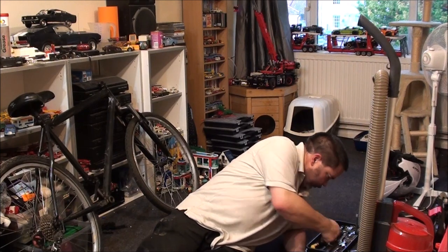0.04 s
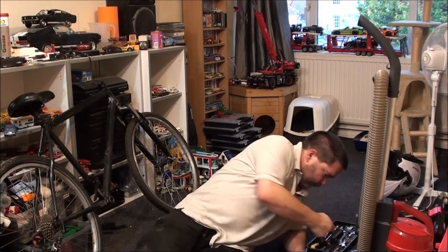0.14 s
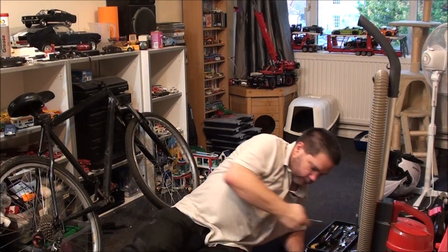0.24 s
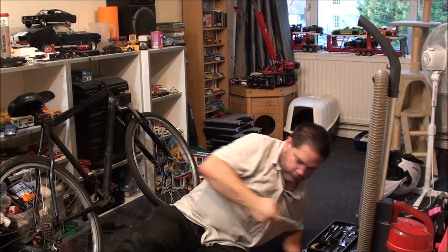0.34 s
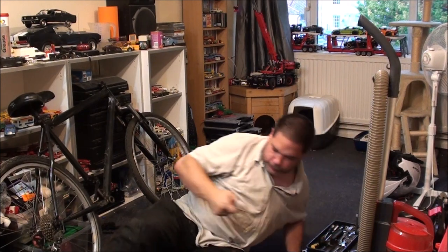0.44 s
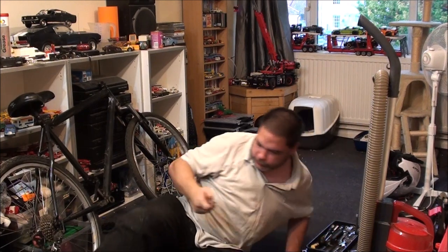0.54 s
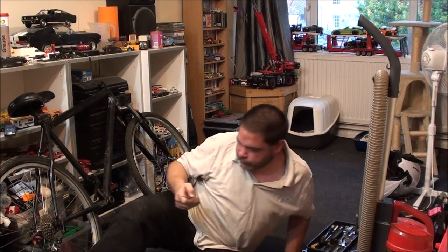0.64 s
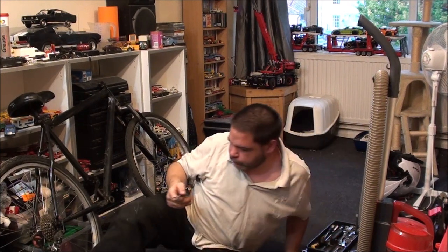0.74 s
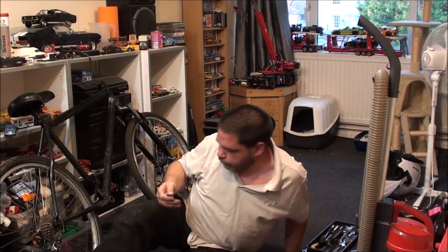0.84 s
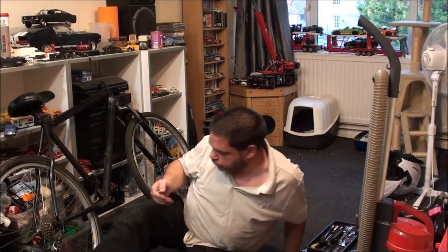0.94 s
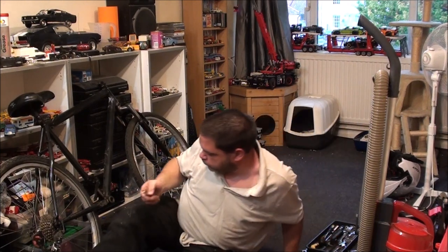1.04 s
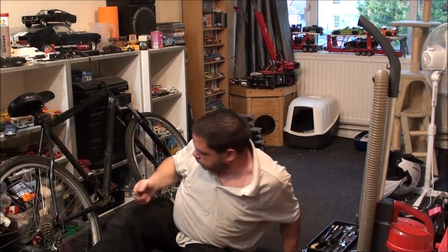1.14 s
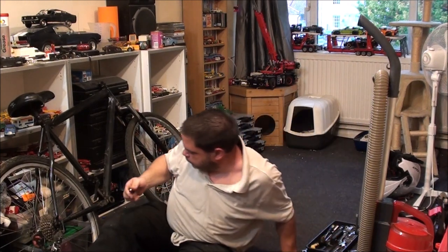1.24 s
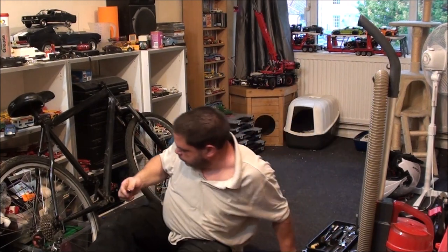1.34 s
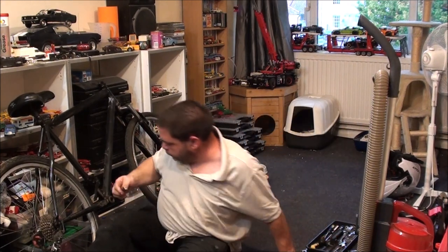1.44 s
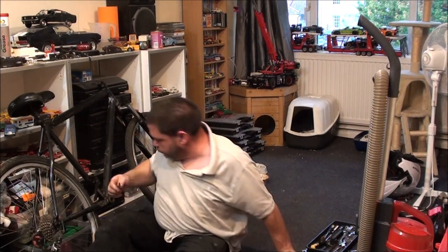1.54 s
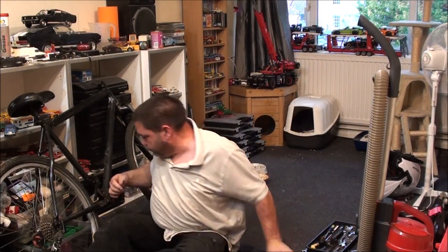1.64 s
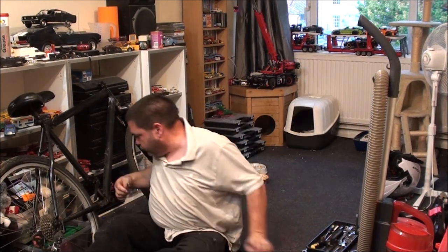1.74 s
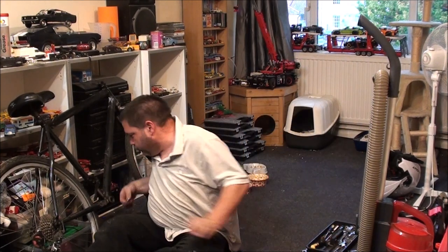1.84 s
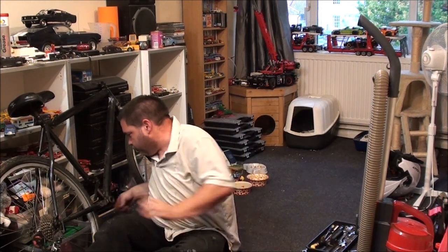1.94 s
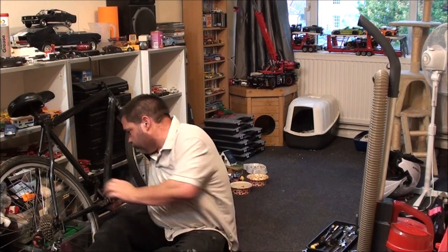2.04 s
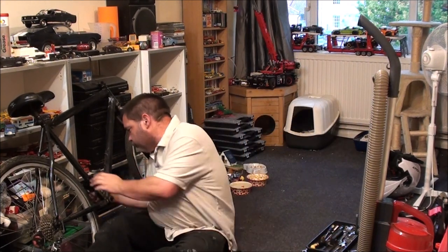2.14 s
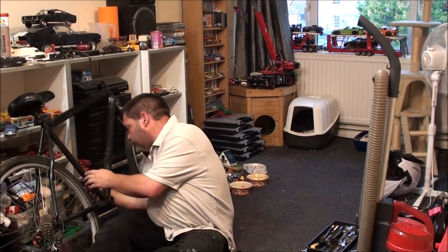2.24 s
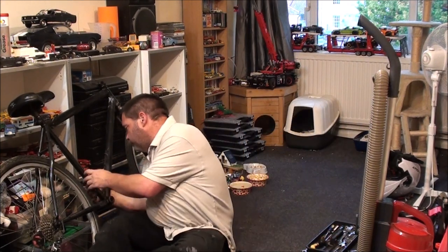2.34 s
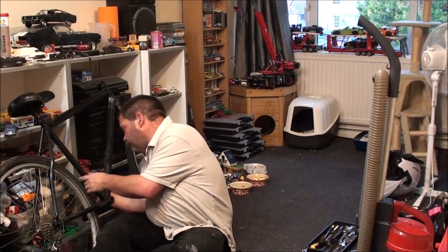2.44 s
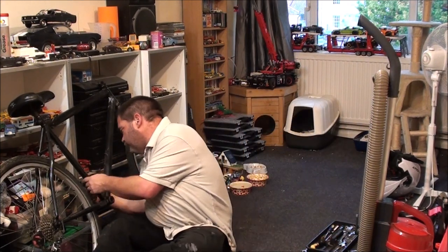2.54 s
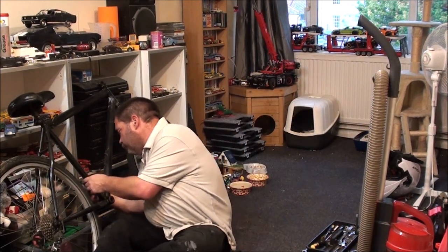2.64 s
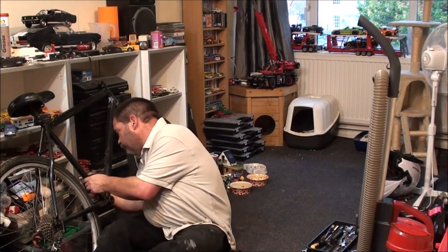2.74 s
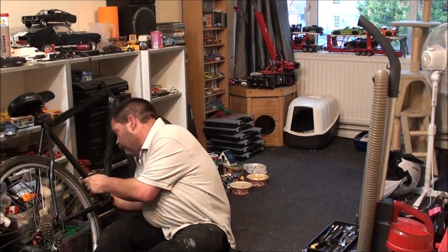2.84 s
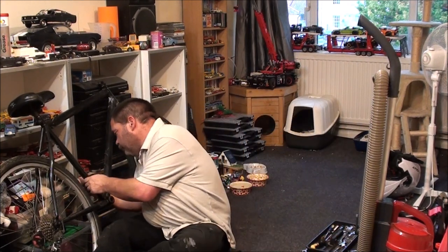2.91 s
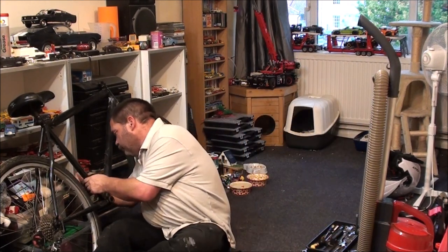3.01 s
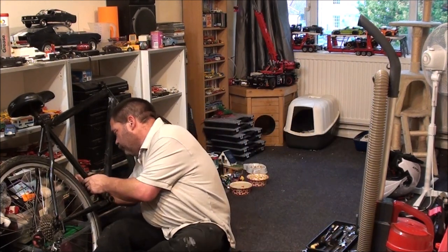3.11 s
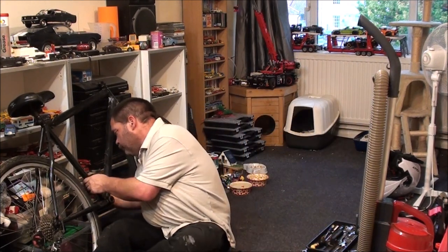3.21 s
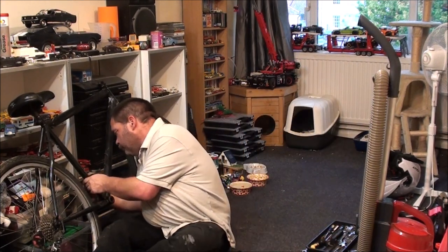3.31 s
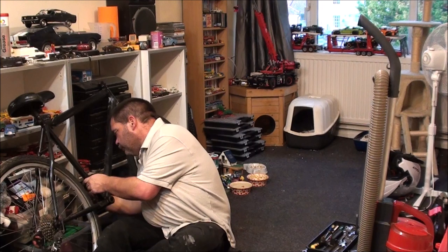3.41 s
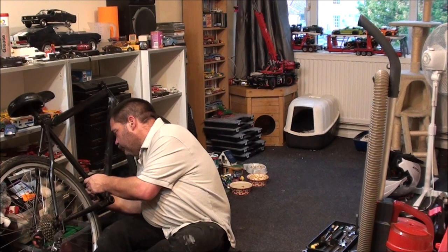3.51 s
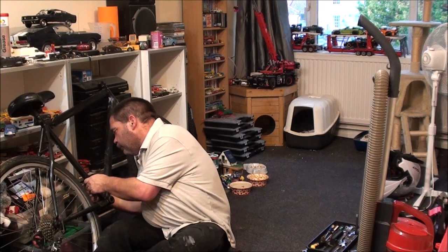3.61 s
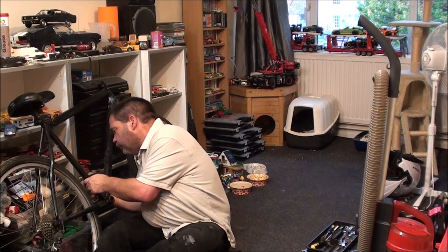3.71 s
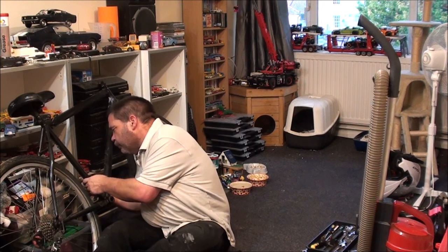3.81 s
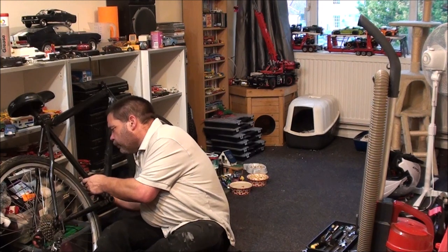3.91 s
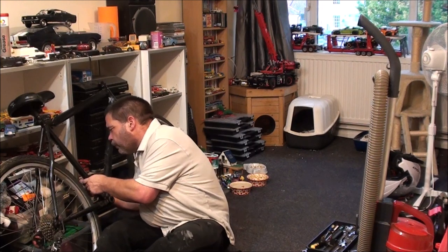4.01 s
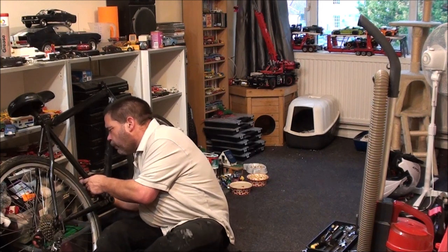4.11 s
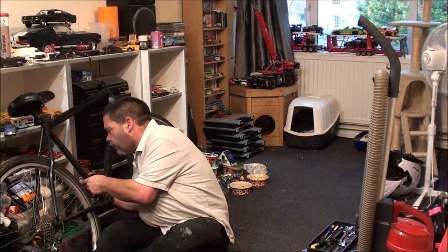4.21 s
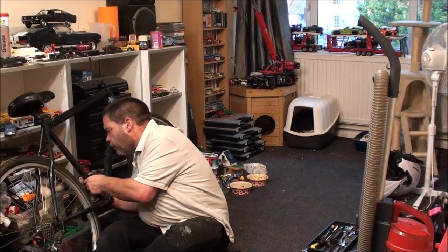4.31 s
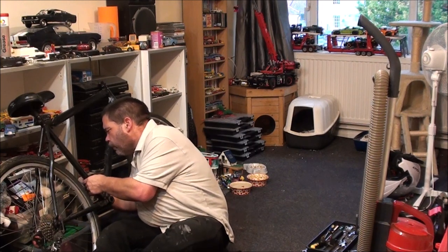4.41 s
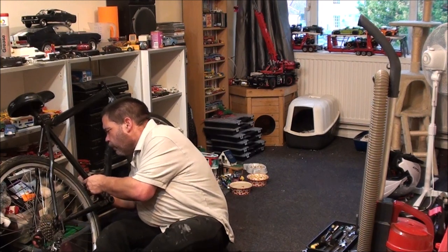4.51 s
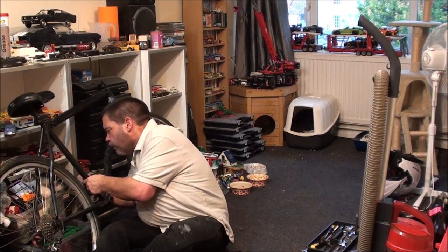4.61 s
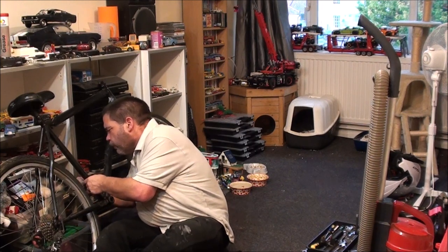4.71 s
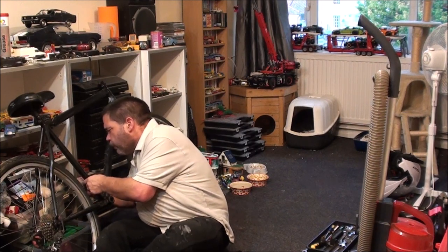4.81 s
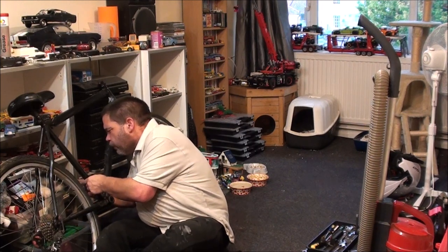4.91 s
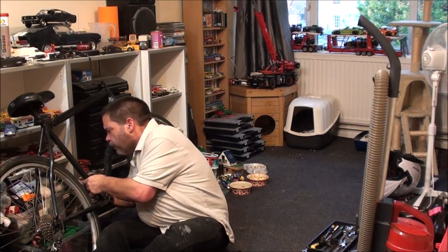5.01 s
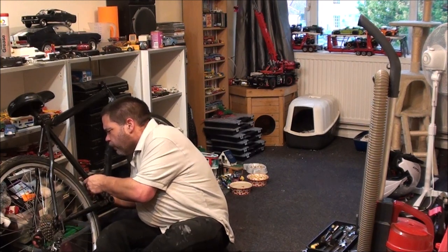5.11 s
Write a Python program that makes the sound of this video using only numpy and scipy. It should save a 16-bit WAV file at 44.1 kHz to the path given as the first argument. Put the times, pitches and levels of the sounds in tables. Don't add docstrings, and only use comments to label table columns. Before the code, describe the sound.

Close, bright tool clinks and a plastic clatter open the scene, then a tight group of three hollow knocks. Soft body movement drags over carpet and thuds lightly. Spaced metallic snaps follow on bike tubing, one very loud, one barely audible, one moderate. Short dry indoor reverberation, nearly centred stereo, with low hum, thin hiss and automatic gain that ducks and slowly recovers.

```python
import sys
import numpy as np
from scipy import signal
from scipy.fft import rfft, irfft
from scipy.io import wavfile
from scipy.ndimage import uniform_filter1d

SR = 44100
rng = np.random.default_rng(int(sys.argv[2]) if len(sys.argv) > 2 else 0)


def store_pcm(level_fs):
    pcm = np.round(np.clip(level_fs, -1, 1) * 32767).astype(np.int16)
    wavfile.write(sys.argv[1], SR, np.atleast_2d(pcm).T)


def convert_level_to_amplitude(level_db):
    exponent = np.asarray(level_db, float) / 20
    return 10 ** exponent


N = 227458


def tray():
    # start_s, peak_db
    first_clinks = [
        (0.0184, -19.5),
        (0.032, -20.5),
        (0.0385, -32),
    ]
    second_clinks = [
        (0.0725, -5.5),
        (0.0855, -16),
        (0.094, -35),
    ]
    tool_hz = [2050, 5110, 5426, 5870, 6425, 6977, 7155, 8543, 9410, 11340, 11395, 11610, 12330, 12910,
               14050, 14810]
    # first_clink_db, second_clink_db, t60_s
    tool_modes = [(-3, -12, 0.055), (-4, -15, 0.057), (-3, -20, 0.046), (-22, -24, .1), (6, 2.5, 0.077),
                  (-4, -16, 0.088), (-15, 0.5, 0.16), (-7, -5.5, 0.18), (-9, -27, 0.11), (-24, -8, 0.28),
                  (-3, 3.5, 0.22), (-22, -20, 0.082), (-26, -18, .14), (-10, -26, 0.1), (-28, -11, 0.15),
                  (-30, -7, .13)]
    # start_s, peak_db
    drops = [
        (0.0185, -20),
        (0.0725, -30),
        (0.0855, -2),
        (0.0995, -8),
        (0.112, -16),
    ]
    # start_s, peak_db
    knocks = [
        (0.4385, 0.87),
        (0.4605, 3.1),
        (0.4885, 3.1),
    ]
    # pitch_hz, level_db_per_hz
    drop_colour = [(120, -30), (200, -23.5), (1090, 3), (1540, -9), (2420, -13.5), (2950, -11),
                   (5550, -14.5), (7280, -14), (10800, -24), (11600, -17), (15000, -32)]
    knock_colour = [(120, -63), (200, -41), (427, -1.5), (503, -8.5), (636, 0.5), (896, -15.5),
                    (1090, -7.5), (1200, -15.5), (2020, -22), (2380, -37.5), (7280, -52), (15000, -77)]
    # pitch_hz, level_db, t60_s
    floor_modes = [(885, -2, 2.6), (1196, -8, 0.25), (1470, -10, 0.29), (1802, -8, 5.0), (1992, -14, 0.27),
                   (2200, 6, 0.24), (2337, -4, 0.23), (2410, 4.5, 0.037)]
    wall_modes = [(543, -18, 0.27), (610, -18, 0.42), (710, -3, 0.082), (740, 4.5, 0.19), (1100, -9, 0.23),
                  (1260, -15, 0.46), (1380, -18, 0.28), (1610, -24, 0.16), (1723, -23, 0.15),
                  (2030, -30, 0.48)]

    first_db, second_db, t60_s = np.transpose(tool_modes)
    first_modes = np.transpose([tool_hz, first_db, t60_s])
    second_modes = np.transpose([tool_hz, second_db, t60_s])
    steel = ring(first_clinks, first_modes, -7.0, 0.4, uneven_db=5.0)
    steel += ring(second_clinks, second_modes, -15.5, 0.93, uneven_db=2.5)
    drop = crack(drops, drop_colour, 5.5) + ring(drops, floor_modes, -32.5, 0.45)
    knock = crack(knocks, knock_colour, 4.6) + ring(knocks, wall_modes, -27.5, 0.12)
    out = room(steel, direct_db=-5.5, wet_db=-24.5, side_db=-13, pan_db=0.1)
    out += room(drop, direct_db=-1.5, wet_db=-16, side_db=-17.0, pan_db=0.1)
    out += room(knock, direct_db=8.9, wet_db=-19.5, side_db=-17.5, pan_db=0.1)
    return out


def snaps():
    # start_s, peak_db
    blows = [
        (2.3783, -9.5),
        (2.6485, -3),
        (3.3622, 10),
        (4.052, -31.5),
        (4.366, -11.5),
    ]
    # pitch_hz, level_db_per_hz
    first_colour = [(530, -17), (900, -11.5), (1180, -7), (1440, -8), (2100, -18), (2300, -8.5),
                    (2970, -15), (3640, -11.5), (5030, -9.5), (6720, -0.5), (7520, -8.5), (9940, -18),
                    (11600, -30), (13000, -37)]
    second_colour = [(530, -23), (900, -11.5), (1310, -17), (1660, -8.5), (2040, -15.5), (2450, -2.5),
                     (3110, -15), (3470, 0.5), (3860, -7.5), (4200, -0.5), (4700, -6), (6480, -10.5),
                     (6940, -3.5), (7350, -8.5), (8600, -4.5), (9500, -15), (12400, -18), (16000, -27)]
    loud_colour = [(190, -40), (320, -23.5), (409, -29.5), (737, -21), (787, -38), (1090, -11.5),
                   (1240, -23), (1490, -12.5), (1800, -26), (2300, -12), (2900, -18.5), (3220, -9.5),
                   (3800, -12), (4540, -24.5), (5750, -4), (6720, -1), (7400, -5), (10800, -9),
                   (16000, -24)]
    faint_colour = [(880, -50), (1500, -13), (2380, -5), (2600, -1), (3120, -5), (3840, -3), (4450, -13),
                    (5480, -7), (7400, -9), (8620, -0.5), (12000, -31), (15600, -56), (22000, -120)]
    last_colour = [(290, -29), (500, -15), (559, -2), (608, -17), (729, -10.5), (1140, -2), (1930, -9),
                   (2560, -0.5), (2940, -11), (3780, -1.5), (4280, -5.5), (6780, -6.5), (9740, -19),
                   (14000, -45)]
    frame_hz = [345, 1093, 2230, 2466, 2622, 2832, 3138, 3365, 3500, 4075, 5340, 5685, 5798, 6352, 6508,
                6632, 6940, 8016, 9265, 9620, 10490]
    # level_over_colour_db, t60_s
    frame_modes = [(2.5, 0.34), (-6, 0.15), (-1, 0.41), (-10, 0.42), (-13, 0.3), (-1, 0.47), (-1, .22),
                   (-1, 0.27), (-2, .24), (-4, 0.22), (-11, .2), (-9, 0.16), (3, 0.16), (-4, 0.32),
                   (0, 0.23), (-1, 0.29), (-10, 0.48), (-9, 0.14), (-11, 0.13), (-15, .14), (14, 0.18)]

    colours = [first_colour, second_colour, loud_colour, faint_colour, last_colour]
    modes = np.column_stack([frame_hz, frame_modes])
    cracks, tubes = np.zeros(N), np.zeros(N)
    for blow, colour in zip(blows, colours):
        cracks += crack([blow], colour, 2.95)
        tubes += ring([blow], modes, -23.5, 0.9, colour=colour, uneven_db=2.5)
    out = room(cracks, direct_db=-36, wet_db=-13, side_db=-16, pan_db=0.5)
    return out + room(tubes, direct_db=-5.5, wet_db=-29, side_db=-10.5, pan_db=0.46)


def ticks():
    # start_s, peak_db
    contacts = [
        (0.368, -32),
        (0.4387, -7.5),
        (0.461, -33),
        (0.4885, -6),
        (0.605, -21.5),
        (1.551, -22),
        (3.3575, -13),
        (4.5515, -27),
    ]
    # pitch_hz, level_db_per_hz
    colour = [(1500, -25), (3500, 6), (7500, -8), (10500, -13.5), (14000, -29)]
    t = np.arange(SR // 100) / SR
    chatter = rng.standard_normal(len(t)) * convert_level_to_amplitude(-60 * t / 0.002)
    chatter /= np.linalg.norm(chatter)
    pulses = crack(contacts, colour, 5.3)
    chattered = signal.oaconvolve(pulses, chatter)[:N]
    return room(chattered, direct_db=0.5, wet_db=-26, side_db=-14, pan_db=0.2)


def rustle():
    # start_s, length_s, drag_db, cloth_db
    moves = [(-0.08, 0.32, -34.5, -38), (0.18, 0.29, -32, -37), (0.327, .12, -50, -41),
             (0.505, 0.25, -41, -39.5), (0.739, 0.34, -40, -40.5), (0.87, 0.11, -37, -49),
             (1.25, 0.8, -48, -47.5), (1.9, 1, -50.5, -51.5), (2.35, 0.45, -37, -45),
             (2.748, 0.67, -50, -51.5), (4.0, .2, -56, -61), (4.288, 0.36, -49.5, -55.5),
             (4.77, 0.12, -49.5, -62), (4.95, 0.18, -60, -65)]
    # start_s, length_s, level_db
    leans = [(0.07, 0.098, -33.5), (0.98, 0.089, -40), (0.22, 0.23, -32), (0.4, 0.24, -31.5),
             (0.85, .11, -31), (1.3, 0.046, -42), (1.4, .15, -47), (1.63, 0.086, -41.5),
             (1.78, 0.16, -39.5), (2.4, 0.21, -37.5), (2.57, 0.087, -35), (3.2, .13, -43), (3.9, 0.06, -59),
             (4.14, .07, -54), (4.79, .09, -52), (5.07, .09, -49)]
    # pitch_hz, level_db_per_hz
    weight_spectrum = [(120, -24), (190, -4.5), (300, -2), (450, -3), (700, -14.5)]
    drag_spectrum = [(400, -2.5), (650, -1), (900, 1.5), (1500, -8), (2300, -11), (3200, -38)]
    cloth_spectrum = [(1180, -19), (2000, 4), (2850, -17.5), (3280, -4), (4380, -10.5), (5850, -3.5),
                      (7230, -6), (13000, -19.5)]
    fidget_weight_db, fidget_drag_db, fidget_cloth_db = -47, -51, -53

    start_s, length_s, drag_db, cloth_db = np.transpose(moves)
    gain_db = slow_gain_db()
    weight = convert_level_to_amplitude(-4.5) * swells(leans, fidget_weight_db + gain_db)
    drag = swells(zip(start_s, length_s, drag_db - 3.2), fidget_drag_db + gain_db)
    cloth = swells(zip(start_s, length_s, cloth_db - 0.44), fidget_cloth_db + gain_db)
    out = weight * banded_noise(weight_spectrum, patchy_db=1.6, rate_hz=9.1, apart=0.36)
    out += drag * banded_noise(drag_spectrum, patchy_db=1.17, rate_hz=22, apart=0.25)
    out += cloth * banded_noise(cloth_spectrum, patchy_db=0.91, rate_hz=52, apart=0.86)
    return out


def motor():
    # start_s, length_s, first_order_db, third_order_db
    loads = [
        (0.0, 0.39, -63, -55),
        (0.507, 0.75, -55.5, -48.5),
        (1.263, 0.31, -57, -54),
        (1.545, 0.21, -57, -70),
        (1.87, 0.56, -61, -48.5),
        (2.296, 0.61, -60, -53),
        (2.75, 0.84, -66, -48.5),
        (2.996, 0.61, -48.5, -59),
        (4.0, 0.5, -59, -84),
        (4.798, 0.38, -55, -57),
    ]
    turn_hz, rest_first_db, rest_third_db = 181, -58.5, -50.5

    start_s, length_s, first_db, third_db = np.transpose(loads)
    gain_db = slow_gain_db()
    phase = 2 * np.pi * np.cumsum(turn_hz * (1 + 0.00224 * drift(2.8))) / SR
    first = swells(zip(start_s, length_s, first_db), rest_first_db + gain_db) * convert_level_to_amplitude(4.5 + 1.93 * drift(5.8))
    third = swells(zip(start_s, length_s, third_db), rest_third_db + gain_db) * convert_level_to_amplitude(6 + 4.8 * drift(0.9))
    return first * np.sin(phase) + third * (np.sin(3 * phase) + convert_level_to_amplitude(-12) * np.sin(6 * phase))


def whine():
    # pitch_hz, width_hz, level_db
    resonances = [
        (95.7, 10.8, -56.5),
        (4054, 170, -60),
        (7100, 51, -62.5),
    ]
    out, white = np.zeros(N), rng.standard_normal(N)
    for hz, width_hz, level_db in resonances:
        r = np.exp(-np.pi * width_hz / SR)
        poles = [1, -2 * r * np.cos(2 * np.pi * hz / SR), r * r]
        out += convert_level_to_amplitude(level_db) * rms_one(signal.lfilter([1, 0, -1], poles, white))
    return out


def hiss():
    # pitch_hz, level_db_per_hz
    hiss_spectrum = [(25, -26), (60, -9), (100, -19.5), (140, -13), (200, -4.5), (400, -11), (900, -12),
                     (2000, -16.5), (4000, -22), (8000, -23), (12000, -29.5), (16000, -22)]
    return convert_level_to_amplitude(-42.5) * banded_noise(hiss_spectrum, patchy_db=0.46, rate_hz=11.5, apart=3.5)


def slow_gain_db():
    duck_at_s, duck_takes_s, duck_db, recover_db_s = 3.36, 0.027, -7.5, 1.43
    since_s = np.arange(N) / SR - duck_at_s
    return duck_db * np.clip(since_s / duck_takes_s, 0, 1) + recover_db_s * np.maximum(since_s, 0)


def crack(events, colour, level_db):
    size, out = 4096, np.zeros(N)
    hz = np.arange(1, size // 2 + 2) * SR / size
    cepstrum = irfft(np.log(colour_gain(colour, hz)))
    cepstrum[1:size // 2] *= 2
    cepstrum[size // 2 + 1:] = 0
    pulse = irfft(np.exp(rfft(cepstrum)))[:size // 2]
    pulse /= np.linalg.norm(pulse)
    for start_s, peak_db in events:
        add(out, start_s, convert_level_to_amplitude(peak_db + level_db) * pulse)
    return out


def ring(events, modes, level_db, damping, colour=((1, 0), (2, 0)), uneven_db=5.5):
    out, luck = np.zeros(N), rng.standard_normal((len(events), len(modes)))
    hz, mode_db, t60_s = np.transpose(modes)[:, :, None]
    t = np.arange(SR // 3) / SR
    decay_db = -60 * t / (np.minimum(t60_s, 0.45) * damping)
    rings = colour_gain(colour, hz) * convert_level_to_amplitude(mode_db + decay_db) * np.sin(2 * np.pi * hz * t)
    for (start_s, peak_db), own in zip(events, luck):
        add(out, start_s, convert_level_to_amplitude(peak_db + level_db + uneven_db * own) @ rings)
    return out


def room(x, direct_db, wet_db, side_db, pan_db):
    t = np.arange(SR // 3) / SR
    mid, side = diffuse(rng.standard_normal((2, 2, len(t))), t)
    side = signal.sosfilt(signal.butter(1, 12000, fs=SR, output="sos"), side)
    tail = mid + convert_level_to_amplitude(side_db) * side * [[1], [-1]]
    tail = tail * convert_level_to_amplitude(wet_db) * np.minimum(t / 0.0002, 1)
    tail[:, 0] = convert_level_to_amplitude(direct_db)
    tail = signal.sosfilt(signal.butter(4, 280, "high", fs=SR, output="sos"), tail)
    pan = convert_level_to_amplitude(np.array([[pan_db / 2], [-pan_db / 2]]))
    return signal.oaconvolve(x[None], tail, axes=1)[:, :N] * pan


def diffuse(white, t):
    # pitch_hz, t60_s
    room_t60 = [(300, 0.18), (1000, 0.18), (3000, 0.2), (7000, 0.19), (14000, 0.12)]
    tail = 0
    for k, (sos, hz) in enumerate(bands(2)):
        tail = tail + signal.sosfilt(sos, white[k % 2]) * convert_level_to_amplitude(-60 * t / at_hz(room_t60, hz))
    spectrum = rfft(tail, 2 * len(t))
    hz = np.arange(1, len(t) + 2) * SR / 2 / len(t)
    expected = at_hz(room_t60, hz) * SR / 2 / np.log(1000)
    found = uniform_filter1d(np.abs(spectrum) ** 2, size=120, axis=1)
    return irfft(spectrum * np.sqrt(expected / found))[:, :len(t)]


def banded_noise(spectrum, patchy_db, rate_hz, apart):
    # pitch_hz, channel_likeness (0..1)
    likeness = [(30, 0.97), (100, 1), (300, 0.98), (700, 0.85), (1500, 0.86), (4000, 0.84), (8000, 0.96),
                (14000, 1)]
    out, together, white = 0, drift(rate_hz / 3), rng.standard_normal((2, 2, N))
    for k, (sos, hz) in enumerate(bands(2)):
        if spectrum[0][0] < hz < spectrum[-1][0]:
            mid, side = signal.sosfilt(sos, white[k % 2])
            alike = np.clip(1 - apart * (1 - at_hz(likeness, hz)), 0, 1)
            gain = convert_level_to_amplitude(at_hz(spectrum, hz) + patchy_db * (together + drift(rate_hz)))
            out = out + gain * (np.sqrt(1 + alike) * mid + np.sqrt(1 - alike) * side * [[1], [-1]])
    return rms_one(out)


def swells(rows, rest_db):
    t, power = np.arange(N) / SR, convert_level_to_amplitude(rest_db) ** 2
    rise_share = 0.4
    for start_s, length_s, top_db in rows:
        corners_s = [start_s, start_s + rise_share * length_s, start_s + length_s]
        shape = np.interp(t, corners_s, [0, 1, 0])
        power = power + (convert_level_to_amplitude(top_db) * np.sin(np.pi / 2 * shape)) ** 2
    return np.sqrt(power)


def drift(rate_hz):
    r = np.exp(-80 * np.pi * rate_hz / SR)
    white = rng.standard_normal(N // 40 + 2002)
    slow = signal.lfilter([1], [1, -2 * r, r * r], white)[2000:]
    return np.interp(np.arange(N) / 40, np.arange(len(slow)), rms_one(slow))


def bands(per_octave):
    edges_hz = 23 * 2 ** np.arange(0, 9.7, 1 / per_octave)
    return [(signal.butter(2, (low, high), "band", fs=SR, output="sos"), np.sqrt(low * high))
            for low, high in zip(edges_hz, edges_hz[1:])]


def at_hz(points, hz):
    table_hz, value = np.array(points)[:, 0], np.array(points)[:, 1]
    return np.interp(np.log(hz), np.log(table_hz), value)


def colour_gain(colour, hz):
    return convert_level_to_amplitude(at_hz(colour, hz))


def rms_one(x):
    return x / np.sqrt(np.mean(x ** 2) + 1e-20)


def add(out, start_s, pulse):
    start = round(start_s * SR)
    out[start:start + len(pulse)] += pulse
    return out


def scene():
    blows = tray() + snaps() + ticks()
    floor = hiss() + whine()
    steady = rustle() + motor() + convert_level_to_amplitude(slow_gain_db()) * floor
    pan_db = 0.5
    return blows + steady * convert_level_to_amplitude([[pan_db / 2], [-pan_db / 2]])


def top_cut(x):
    return signal.sosfilt(signal.butter(12, 16660, fs=SR, output="sos"), x)


def record(dry):
    limit_db, release_db_s = -13.5, 500
    sensed = signal.sosfilt(signal.butter(1, 2500, "high", fs=SR, output="sos"), dry)
    power = uniform_filter1d(np.mean(sensed ** 2, axis=0), size=220)
    level_db = 10 * np.log10(power + 1e-12)
    fall_db = release_db_s * np.arange(N) / SR
    held_db = np.maximum.accumulate(level_db + fall_db) - fall_db
    over_db = np.maximum(held_db - limit_db, 0)
    limited = dry * convert_level_to_amplitude(-0.85 * uniform_filter1d(over_db, size=66))
    rounded = limited / (1 + limited ** 6) ** (1 / 6)
    cut = signal.sosfilt(signal.cheby2(10, 30, 15950, fs=SR, output="sos"), rounded)
    return top_cut(cut)


dry = scene()
out = record(dry)
store_pcm(out)
```